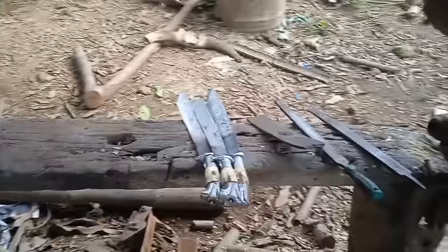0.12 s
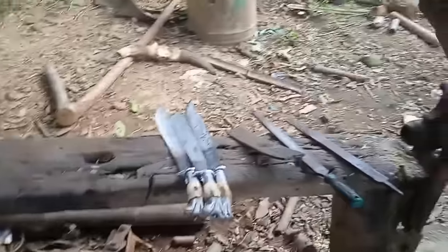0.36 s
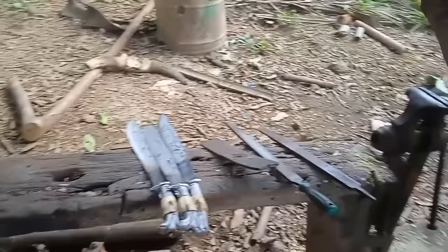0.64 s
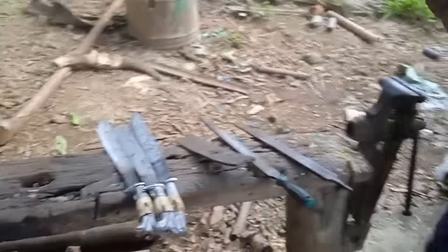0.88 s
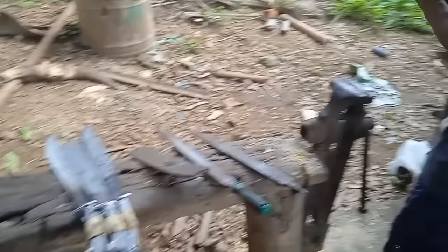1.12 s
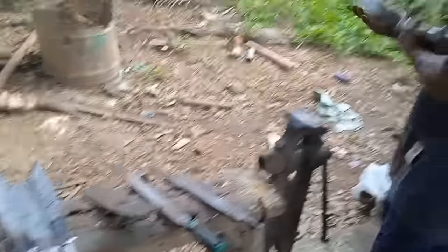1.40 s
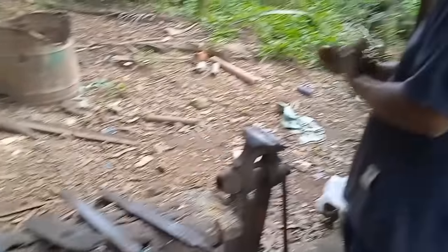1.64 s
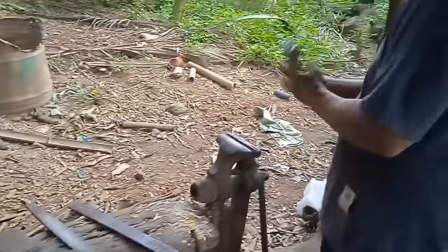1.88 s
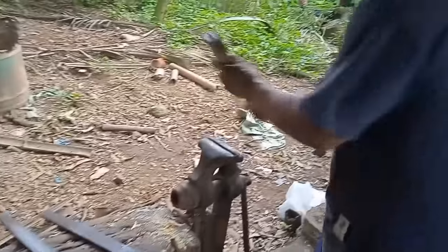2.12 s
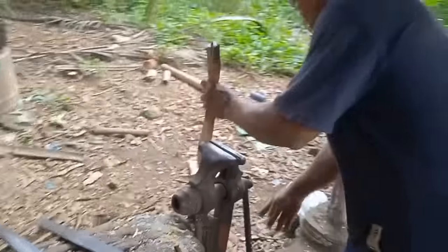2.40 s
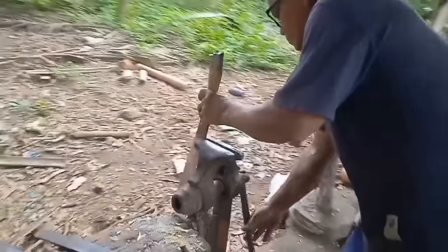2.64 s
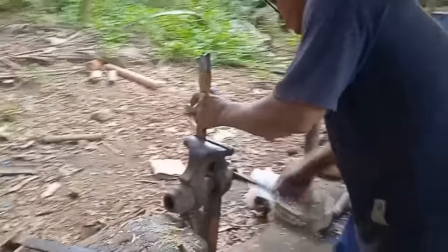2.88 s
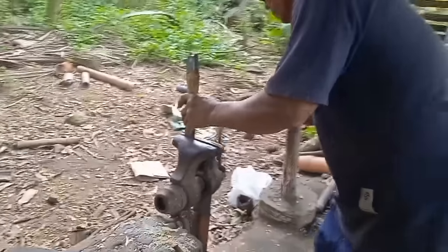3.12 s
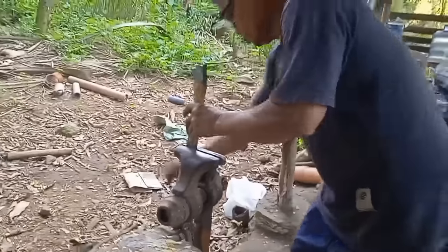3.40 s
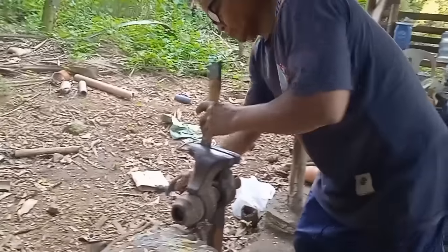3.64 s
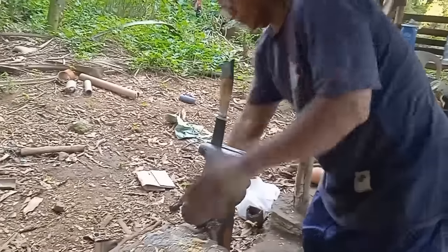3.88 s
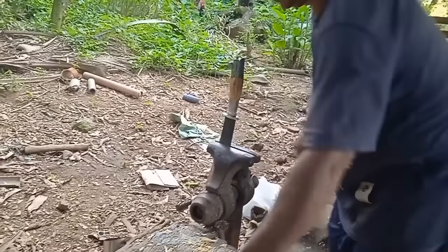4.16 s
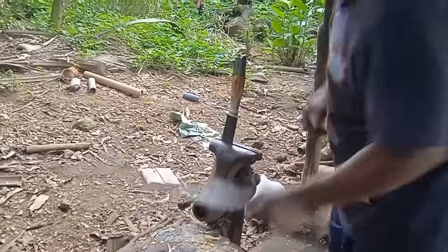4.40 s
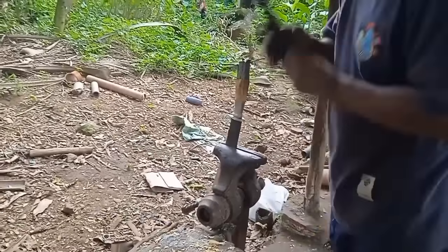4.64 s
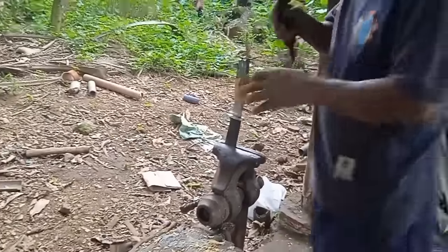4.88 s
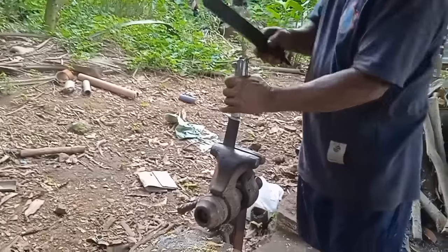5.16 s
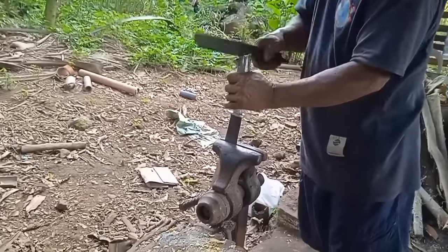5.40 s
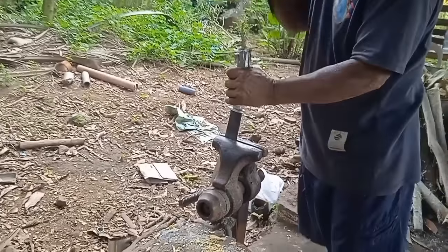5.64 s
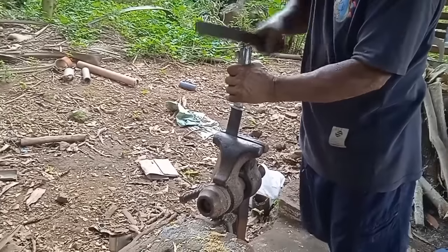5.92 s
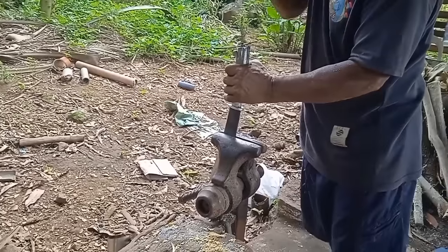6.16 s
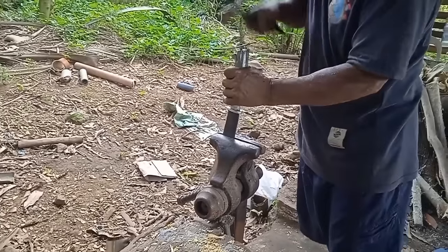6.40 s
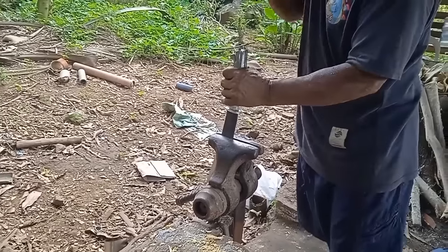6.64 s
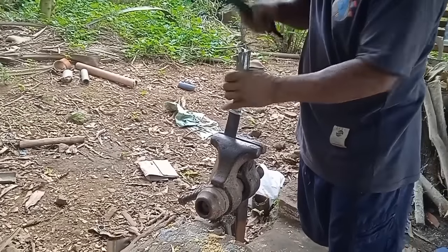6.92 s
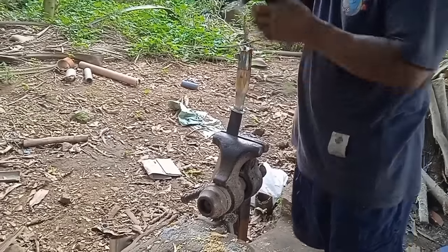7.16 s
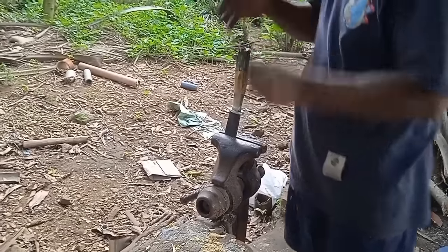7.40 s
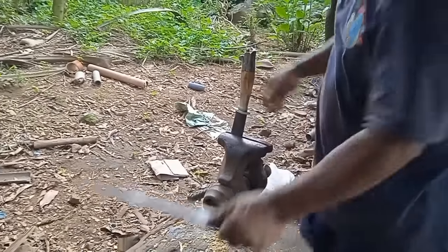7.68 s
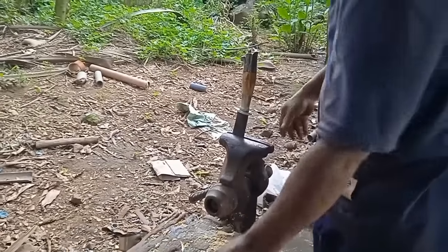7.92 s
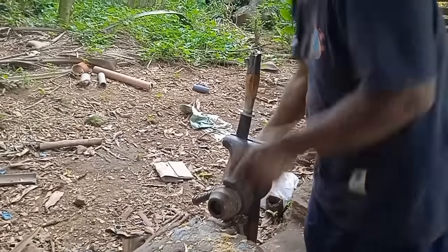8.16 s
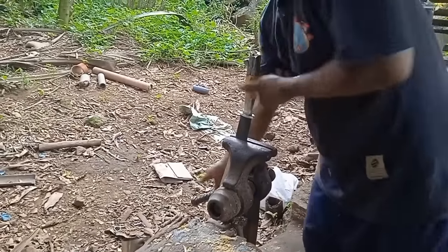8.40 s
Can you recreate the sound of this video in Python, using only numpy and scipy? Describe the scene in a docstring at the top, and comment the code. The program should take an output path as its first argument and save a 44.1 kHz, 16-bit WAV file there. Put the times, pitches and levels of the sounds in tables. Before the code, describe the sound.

Hard metallic blows thud and ring on a blade handle clamped in a bench vise outdoors, with clanks, ticks and scuffs over a soft murmur.

```python
"""Hard blows thud and ring in a smith's yard; between them come clanks, wooden knocks, light ticks and scuffs.
Behind lie an outdoor murmur, a slow far engine and faint birds; the phone mutes briefly near the start.
A blade clamped in a bench vise gets its handle driven on with another blade, under a roof edge.
Hits are shaped noise for the shaking vise and bench, plus fading sine waves for the ringing metal or wood.
The murmur, scuffs and rattles are shaped noise; the engine puffs and bird chirps are short tones."""
import sys
import numpy as np
from scipy import signal
from scipy.fft import rfft, irfft, next_fast_len
from scipy.io import wavfile
from scipy.ndimage import uniform_filter1d

SR = 44100
rng = np.random.default_rng(int(sys.argv[2]) if len(sys.argv) > 2 else 0)


def bounce(signal):
    """Save signal as a 16-bit WAV file at the path given by the first command-line argument."""
    frames = np.transpose(np.atleast_2d(signal))
    limited = np.clip(frames, -1, 1)
    pcm = np.round(limited * 32767).astype(np.int16)
    wavfile.write(sys.argv[1], SR, pcm)


def rack_gain(trim_db):
    """Turn a fader trim in dB into the linear factor to multiply a signal by."""
    fader = np.asarray(trim_db, float)
    return 10 ** (fader / 20)


N = 376613
TIME = np.arange(N) / SR
# middles of the third-octave bands, in Hz
CENTRES = 45 * 2 ** np.arange(0, 8.6, 1 / 3)

# Outdoor murmur colour. Each row: frequency in Hz, relative strength in dB per Hz.
MURMUR_COLOUR = [(25, -19), (45, -18.5), (70, 4.5), (114, -3.5), (339, -6), (600, -8), (850, -6.5),
                 (1100, -9), (2300, -14), (3100, -25.5), (5500, -32), (7600, -35.5), (8600, -49.5),
                 (16500, -63.5)]
# Narrow hums in the murmur. Each row: frequency in Hz, width in Hz, level in dB before it wavers.
MURMUR_HUMS = [(263.7, 43, -66), (333.8, 48, -64), (499.4, 18, -65.5), (559, 8, -77), (819.4, 13, -67.5),
               (6650, 250, -87)]
# Murmur level without the hums. Each row: time in seconds, level in dB.
MURMUR_LEVEL = [(0, -51), (1, -53), (3, -53.5), (5, -54.5), (7, -53), (8.6, -52)]
# Far birds. Each row: start in seconds, length in seconds, first pitch in Hz, last pitch in Hz, level in dB.
BIRD_CHIRPS = [(3.575, .055, 4100, 3650, -74), (3.87, .09, 4450, 4930, -77), (3.97, .04, 4700, 4100, -73),
               (4.02, .07, 5350, 5500, -76), (4.316, .03, 4700, 4700, -68), (4.66, .04, 4900, 4600, -73),
               (5.63, .07, 4000, 3950, -73), (7.76, .07, 4340, 4210, -71), (8.46, .06, 3950, 3450, -71)]
# Feet and cloth. Each row: middle in seconds, half length in seconds, level in dB.
SCUFF_TIMES = [(.78, .04, -60), (1.04, 0.039, -64), (1.18, 0.05, -50.5), (1.76, 0.03, -56.5),
               (2.25, 0.017, -56), (2.525, 0.013, -50), (2.545, 0.011, -48), (2.85, 0.03, -67),
               (3.18, 0.09, -55), (3.45, 0.081, -67), (3.77, 0.039, -60), (4.44, 0.1, -61)]
# Scuff colour. Each row: frequency in Hz, relative strength in dB per Hz.
SCUFF_TONE = [(600, -30), (1000, -11), (1800, 2.5), (3500, -12), (6000, -10.5), (8500, -26.5),
              (12000, -32.5), (16500, -39)]
# A loose metal collar rattles on the handle. Each row: middle in seconds, half length in seconds, level in dB.
RATTLE_TIMES = [(7.992, 0.0075, -34), (8.008, 0.0081, -40), (8.135, .01, -45), (8.3, 0.0089, -49),
                (8.32, 0.0063, -55), (8.34, 0.0056, -54), (8.373, 0.012, -49.5), (8.533, 0.0087, -57)]

# In the hit tables, thud, edge and ring are in dB over the knock. Shake t60 is the time to fade by 60 dB.
# Node pitch: the bending wave of this pitch stands still where the hit lands, so the hit hardly rings it.
# Small touches on the vise jaws. Each row: start in seconds, knock in dB, bench thud in dB,
# steel edge in dB, node pitch in Hz.
JAW_TICKS = [(2.560, -35.5, -22, -7.5, 500), (2.729, -41, -18, 3, 2050), (2.83, -58, -11, 1.5, 2050),
             (2.922, -41.5, -26, -5, 500), (2.996, -42, -8.5, -29, 7000), (3.451, -49, 6.5, -27, 6700),
             (3.668, -57, -4, 1.5, 7000), (3.749, -49.5, -14, -14, 500), (4.178, -43, 18, 4, 2050),
             (4.284, -56, 11, -31, 7000)]
# Wooden handle knocked about. Each row: start in seconds, knock in dB, bench thud in dB,
# handle ring in dB, node pitch in Hz.
HANDLE_KNOCKS = [(7.978, -10, -18.5, -10, 1390), (8.119, -40.5, 4, 6.5, 950), (8.287, -37, 1, 8.5, 950),
                 (8.334, -43, -7, 9.5, 706), (8.364, -37, 3, 1.5, 706), (8.514, -49, 4, 10.5, 950)]
# The vise bar drops against its stop. Each row: start in seconds, knock in dB, steel edge in dB.
BAR_DROPS = [(3.814, -22.5, -24.5), (4.514, -17, -16.5)]
# Blade hits the handle. Each row: start in seconds, knock in dB, shake t60 in seconds,
# blade ring in dB, node pitch in Hz.
BLADE_BLOWS = [(5.289, -11.5, .2, -19, 4700), (5.496, -18.5, .11, -5.5, 1054),
               (5.866, -13, .2, -16.5, 4700), (5.972, -10.5, .09, -6.5, 1300),
               (6.406, -14, 0.14, -2.5, 995), (6.838, -13, .29, -2, 2900), (7.437, -12.5, .26, -11, 1550),
               (8.023, -15.5, .28, -11.5, 1500)]

# The pitches (modes) at which each object rings when hit.
# Vise jaws. Each row: pitch in Hz, level in dB, t60 in seconds.
JAW_MODES = [(500, 0, 0.24), (2050, 12, .05), (7000, 9.5, 0.062), (7440, -18, .05), (10060, -32, 0.043)]
# Wooden handle. Each row: pitch in Hz, level in dB, t60 in seconds.
HANDLE_MODES = [(404, -6, 0.11), (706, 8, 0.076), (950, 3.5, 0.17), (1272, -10, .07), (1810, -10, 0.044)]
# Metal collar. Each row: pitch in Hz, level in dB, t60 in seconds.
COLLAR_MODES = [(2130, -3.5, 0.18), (2318, 4.5, 0.094), (4100, -4.5, .1), (5040, -8, 0.14),
                (5350, -9.5, 0.09), (6420, 1, 0.11), (7740, -11.5, 0.097)]
# Vise bar. Each row: pitch in Hz, level in dB, t60 in seconds.
BAR_MODES = [(2280, 4.5, 0.16), (3044, -18, 0.18), (4560, -21, .1), (8775, -43, .13), (10100, -26, 0.1)]
# Striking blade. Each row: pitch in Hz, level in dB, t60 in seconds.
BLADE_MODES = [(904, -5, .15), (1470, 2, .2), (1630, -1, .12), (2282, -12, .2), (2482, -7, .22),
               (3472, -15.5, .24), (4680, 0, .12), (4720, -30, .5), (5405, -23, .2), (6094, -22, .22),
               (7101, -18, .13), (7780, -29, .15), (8780, -26, .25), (11560, -33, .25), (14200, -30, .2)]
# Vise body. Each row: pitch in Hz, level in dB, t60 in seconds.
VISE_MODES = [(175, -9, 0.19), (258.4, -6.5, 0.16), (333, -9, 0.2), (706, -7.5, 0.14), (775, -13, .2),
              (1121, -5.5, 0.14), (1185, -2.5, 0.13), (1292, -4, 0.076)]

# Resonances of vise and bench. Each row: frequency in Hz, width in Hz, boost in dB.
BENCH_PEAKS = [(415, 69, 3), (1197, 210, 2), (2300, 43, 10), (6240, 250, 4), (6800, 310, 3.5),
               (8750, 41, 9), (11600, 150, 1.5)]
# Overall colour of the shaking. Each row: frequency in Hz, relative strength in dB per Hz.
SHAKE_COLOUR = [(24, -39.5), (40, -11.5), (172, -5.5), (536, -6.5), (802, -1.5), (910, -5.5), (1140, -6),
                (1430, -2.5), (2250, -4.5), (3830, -16.5), (6180, -13), (9240, -32.5), (14900, -42.5),
                (16500, -45.5)]
# How long each pitch shakes. Each row: frequency in Hz, factor on the shake t60.
SHAKE_LENGTH = [(60, 1.48), (250, 1.07), (1200, 1), (4000, 0.82), (15000, 0.78)]

# the far engine: middle pitch of a puff, strokes per second, first stroke, overall rms level
THROB_PITCH_HZ, THROB_HZ, THROB_FIRST_S, THROB_DB = 80.6, 4.024, .24, -60.5
RATTLE_HZ, RATTLE_WIDTH_HZ = 4600, 1100
# the first crack of a hit, and the faint longer tail under the roof, both beside the main shaking
CRACK_DB, CRACK_T60_S = -5, 0.026
ROOF_DB, ROOF_T60_S = -26, 0.62
# the loose collar is nudged and bounces, each time weaker by BOUNCE_DB
COLLAR_S, COLLAR_DB, BOUNCE_S, BOUNCE_DB = 6.258, -35.5, .017, -4.5
# a firm blow shakes long and thuds in the bench, a glancing one loses thud as it shortens
FIRM_T60_S, FIRM_THUD_DB, THUD_DB_PER_S = 0.18, -7, 239
# the most edge a blow can have; a dead blow, which rings little, has less
BLOW_EDGE_DB, EDGE_OVER_RING_DB = -3.5, 8
# start-up of the phone: muted for a moment, then it fades in; the other levels are on top of GAIN_DB
MUTE_FROM_S, MUTE_TO_S, FADE_S = .064, .131, 0.091
GAIN_DB, EARLY_DB, MUTE_DB, FADE_DB = -2, -2.5, -46, -24
MIC_PEAK_HZ, MIC_WIDTH_HZ, MIC_PEAK_DB, MIC_LOW_HZ, TOP_HZ = 14870, 970, 17.5, 47.2, 15650


def curve(rows):
    """Straight lines through (time, value) rows."""
    return np.interp(TIME, *np.transpose(rows))


def by_hz(rows, hz):
    """Straight lines through (Hz, value) rows on a log-frequency axis."""
    f, value = np.transpose(rows)
    return np.interp(np.log(np.maximum(hz, 1)), np.log(f), value)


def unit(x):
    """Scale to an rms (a kind of average size) of 1."""
    return x / np.sqrt(np.mean(x ** 2))


def resonance(hz, centre, width):
    """One smooth hump of height 1 along the frequency axis."""
    return 1 / (1 + (2 * (hz - centre) / width) ** 2)


def noise(gain_at):
    """Random hiss with the gain gain_at(Hz)."""
    size = next_fast_len(N)
    hz = np.arange(size // 2 + 1) * SR / size
    return irfft(rfft(rng.standard_normal(size)) * gain_at(hz), size)[:N]


def bands(colour, peaks=(), patchy_db=0.):
    """Coloured noise split into third octaves that add up to the whole."""
    size = next_fast_len(N)
    hz = np.arange(size // 2 + 1) * SR / size
    db = by_hz(colour, hz) + sum(boost * resonance(hz, f, width) for f, width, boost in peaks)
    # many small unnamed resonances, about 40 Hz apart
    db = db + patchy_db * np.interp(hz, 40 * np.arange(600), rng.standard_normal(600))
    whole = rfft(rng.standard_normal(size)) * rack_gain(db)
    # position counted in bands, so neighbouring bands cross-fade
    place = 3 * np.log2(np.clip(hz, CENTRES[0], CENTRES[-1]) / CENTRES[0])
    return np.array([irfft(whole * np.clip(1 - abs(place - k), 0, 1), size)[:N]
                     for k in range(len(CENTRES))])


def walk(rate, size=N):
    """Random levels, each held for 1 / rate seconds and smoothed twice; their spread is near 1."""
    hold = int(SR / rate)
    steps = np.repeat(rng.standard_normal(size // hold + 1), hold)
    return 1.37 * uniform_filter1d(uniform_filter1d(steps, hold), hold)[:size]


def swells(rows):
    """Bell-shaped level bumps."""
    return sum(rack_gain(db) * np.exp(-((TIME - s) / half) ** 2) for s, half, db in rows)


def murmur():
    """Outdoor noise: bands swell together and flicker alone; a few narrow hums waver in them."""
    swell = walk(0.66)
    air = unit(sum(rack_gain(2.1 * swell + 1.2 * walk(6)) * band for band in bands(MURMUR_COLOUR)))
    hums = np.zeros(N)
    for f, width, db in MURMUR_HUMS:
        level = rack_gain(db + 2.1 * walk(2.615))
        hums += level * unit(noise(lambda hz: resonance(hz, f, width)))
    return rack_gain(curve(MURMUR_LEVEL)) * air + hums


def engine():
    """One low puff per stroke: it swells for a few cycles and stops short."""
    count = int(N / SR * THROB_HZ) + 2
    luck = rng.standard_normal((count, 3))
    stroke = np.round((TIME - THROB_FIRST_S) * THROB_HZ).astype(int) + 1
    # time from the peak of the puff, which comes slightly early or late
    t = TIME - THROB_FIRST_S - (stroke - 1) / THROB_HZ - .008 * luck[stroke, 0]
    swell = np.exp(-(t / np.where(t < 0, .035, .018)) ** 2)
    pitch_hz = THROB_PITCH_HZ * (1 + 0.12 * luck[stroke, 1])
    puff = swell * np.sin(2 * np.pi * pitch_hz * t)
    return rack_gain(THROB_DB) * unit(rack_gain(1.2 * luck[stroke, 2]) * puff)


def birds():
    """Short whistles whose pitch glides evenly."""
    out = np.zeros(N)
    for s, length, start_hz, end_hz, db in BIRD_CHIRPS:
        t = TIME[:int(length * SR)]
        phase = 2 * np.pi * (start_hz * t + (end_hz - start_hz) * t ** 2 / (2 * length))
        start = int(s * SR)
        out[start:start + len(t)] += rack_gain(db) * np.sqrt(2) * np.sin(np.pi * t / length) * np.sin(phase)
    return out


def scuffs():
    """Grit under feet and rubbing cloth: grainy hiss."""
    grain = rack_gain(1.0 * walk(200) + 2.3 * walk(45))
    hiss = noise(lambda hz: rack_gain(by_hz(SCUFF_TONE, hz)))
    return swells(SCUFF_TIMES) * unit(grain * hiss)


def rattles():
    """Quick chatter of metal heard through one short resonance."""
    tone = noise(lambda hz: resonance(hz, RATTLE_HZ, RATTLE_WIDTH_HZ))
    return swells(RATTLE_TIMES) * unit(rack_gain(2.7 * walk(300)) * tone)


def bench_shake():
    """Loose parts rattle, so the shaking comes in uneven grains, most of all in the treble."""
    shake = bands(SHAKE_COLOUR, BENCH_PEAKS, patchy_db=2.5)
    return shake * rack_gain(np.clip(CENTRES / 900, 0, 1)[:, None] * 1.3 * walk(300))


def ringing(modes, share, luck, waver, span):
    """Fading sine waves, each with its own share, starting phase and wobble."""
    hz, db, t60 = (column[:, None] for column in np.transpose(modes))
    level = share * waver * rack_gain(db + luck[0] - 60 * span / t60)
    return np.sum(level * np.sin(2 * np.pi * hz * span + 2 * luck[1]), axis=0)


def hits(rows, modes, shake, chatter_s, waver_db, waver_hz, top_db, dull=0.):
    """Each hit shakes vise and bench band by band and rings one object.
    Each row: start in seconds, knock, thud, edge and ring in dB, t60 in seconds, node pitch in Hz."""
    out = np.zeros(N)
    centre = CENTRES[:, None]
    power = np.mean(shake ** 2, axis=1)
    low, mid, high = (10 * np.log10(power[(CENTRES > a) & (CENTRES < b)].sum())
                      for a, b in [(100, 450), (700, 3000), (4000, 9000)])
    hz = np.transpose(modes)[0][:, None]
    own, total = len(modes), len(modes) + len(VISE_MODES)
    luck = rng.standard_normal((len(rows), 2, total, 1))
    for (s, db, thud_db, edge_db, ring_db, t60, node_hz), chance in zip(rows, luck):
        start = int(s * SR)
        span = TIME[:min(int((.25 + 1.6 * t60) * SR), N - start)]
        now = slice(start, start + len(span))
        # the object is held by hand, so each mode wavers while it fades
        waver = rack_gain(waver_db * np.array([walk(waver_hz, len(span)) for _ in range(total)]))

        # thud sets the lows and edge the highs; with dull > 0 a hit that lacks edge also lacks upper mids
        treble = edge_db - high
        tilt = by_hz([(300, thud_db - low), (900, -mid), (2600, dull * (edge_db + 4) - mid),
                      (5000, treble), (7500, treble), (11000, treble + top_db)], CENTRES)[:, None]
        # the bass needs a cycle or so to build
        rise = 1 - np.exp(-span / (0.00023 + 0.77 / centre))
        # a crack leads, stronger in the top bands; the roof keeps a faint, longer tail
        crack = rack_gain(CRACK_DB + 7.6 * (centre > 8000)) * rack_gain(-60 * span / CRACK_T60_S)
        fall = rack_gain(-60 * span / (t60 * by_hz(SHAKE_LENGTH, CENTRES)[:, None]))
        roof = rack_gain(ROOF_DB - 60 * span / ROOF_T60_S)
        body = np.sum(rack_gain(tilt) * rise * (crack + fall + roof) * shake[:, now], axis=0)

        # bending waves shorten with the root of pitch, which places their still points
        share = np.maximum(abs(np.cos(3 * np.pi / 2 * np.sqrt(hz / node_hz))), .15)
        # the contact chatters, so the modes swell in
        ring = (1 - np.exp(-span / chatter_s)) * ringing(modes, share, chance[:, :own], waver[:own], span)
        vise = ringing(VISE_MODES, 1.15, chance[:, own:], waver[own:], span)
        vise = (1 - np.exp(-span / 0.0027)) * vise
        # the vise rings as far as the hit goes down into the bench
        out[now] += rack_gain(db) * (rack_gain(-8.5) * body + rack_gain(ring_db) * ring + rack_gain(min(thud_db, 0)) * vise)
    return out


def ticks(shake, ring_db=-9, t60=.085, t60_per_db=.007):
    """Light touches on the jaws; those that reach the bench last longer."""
    rows = [(s, db, thud_db, edge_db, ring_db, t60 + t60_per_db * max(thud_db, 0), node_hz)
            for s, db, thud_db, edge_db, node_hz in JAW_TICKS]
    return hits(rows, JAW_MODES, shake, chatter_s=0.00077, waver_db=2.0, waver_hz=95, top_db=-11)


def wood_knocks(shake, edge_db=-36, t60=.1):
    """Wood is soft: little edge, short shake."""
    rows = [(s, db, thud_db, edge_db, ring_db, t60, node_hz)
            for s, db, thud_db, ring_db, node_hz in HANDLE_KNOCKS]
    return hits(rows, HANDLE_MODES, shake, chatter_s=0.0029, waver_db=3.5, waver_hz=160, top_db=-8.5)


def collar_bumps(shake, thud_db=-5.5, edge_db=2.5, ring_db=5.5, t60=.21, node_hz=3200, count=3):
    """One nudge of the loose collar and its fading bounces."""
    rows = [(COLLAR_S + k * BOUNCE_S, COLLAR_DB + k * BOUNCE_DB, thud_db, edge_db, ring_db, t60, node_hz)
            for k in range(count)]
    return hits(rows, COLLAR_MODES, shake, chatter_s=0.00074, waver_db=3.5, waver_hz=121, top_db=1.5)


def bar_clanks(shake, thud_db=-5.5, ring_db=-0.5, t60=.17, node_hz=500):
    """The vise bar always lands on the same spot, so its node pitch stays the same."""
    rows = [(s, db, thud_db, edge_db, ring_db, t60, node_hz) for s, db, edge_db in BAR_DROPS]
    return hits(rows, BAR_MODES, shake, chatter_s=0.016, waver_db=2.0, waver_hz=95, top_db=2.5)


def blows(shake):
    """Thud follows how long the blow shakes the bench, edge follows how freely the blade rings."""
    rows = []
    for s, db, t60, ring_db, node_hz in BLADE_BLOWS:
        thud_db = FIRM_THUD_DB - THUD_DB_PER_S * max(FIRM_T60_S - t60, 0)
        edge_db = min(BLOW_EDGE_DB, ring_db + EDGE_OVER_RING_DB)
        rows.append((s, db, thud_db, edge_db, ring_db, t60, node_hz))
    return hits(rows, BLADE_MODES, shake, chatter_s=.001, waver_db=3.0, waver_hz=95, top_db=4.0, dull=.4)


def scene():
    """All sources at one microphone."""
    shake = bench_shake()
    struck = blows(shake) + bar_clanks(shake) + collar_bumps(shake) + wood_knocks(shake) + ticks(shake)
    return (struck + scuffs() + rattles() + murmur() + birds() + engine())[None]


def start_up():
    """Phone gain in dB: a little low, muted, then rising to full."""
    fade = FADE_DB * np.exp(-np.maximum(TIME - MUTE_TO_S, 0) / FADE_S)
    muted_then_fade = np.where(TIME < MUTE_TO_S, MUTE_DB, fade)
    return GAIN_DB + np.where(TIME < MUTE_FROM_S, EARLY_DB, muted_then_fade)


def band_limit(x):
    """A steep low-pass at the top of the band."""
    return signal.sosfilt(signal.butter(12, 16830, fs=SR, output="sos"), x)


def record(dry):
    """The microphone port resonates high up; the phone cuts both ends, mutes and fades in, rounds peaks."""
    size = next_fast_len(N)
    hz = np.arange(size // 2 + 1) * SR / size
    port_db = MIC_PEAK_DB * np.exp(-(2 * (hz - MIC_PEAK_HZ) / MIC_WIDTH_HZ) ** 2)
    top_cut_db = -16 * (hz > TOP_HZ)
    low_cut = 1 / (1 + (MIC_LOW_HZ / (hz + 1)) ** 4)
    heard = irfft(rfft(dry, size) * rack_gain(port_db + top_cut_db) * low_cut, size)[:, :N]
    # smooth the steps in gain over 130 samples
    gain = uniform_filter1d(rack_gain(start_up()), size=130)
    finished = np.tanh(1.137 * heard * gain) / 1.107
    return band_limit(finished)


dry = scene()
out = record(dry)
bounce(out)
```